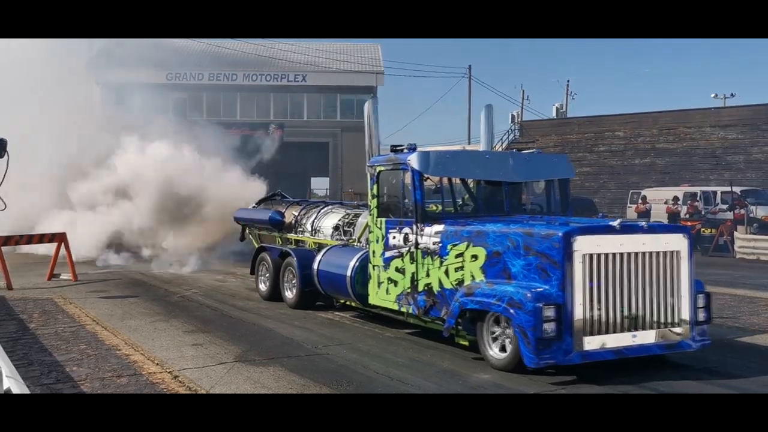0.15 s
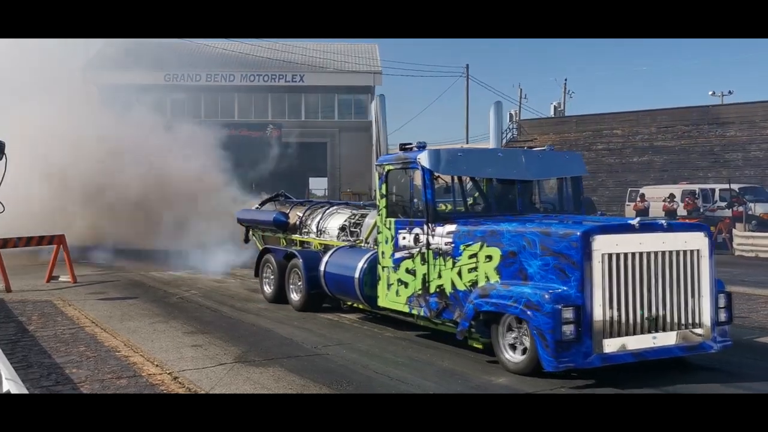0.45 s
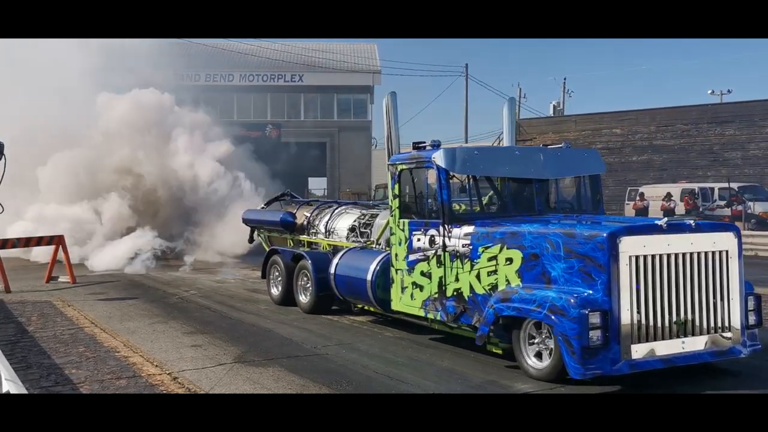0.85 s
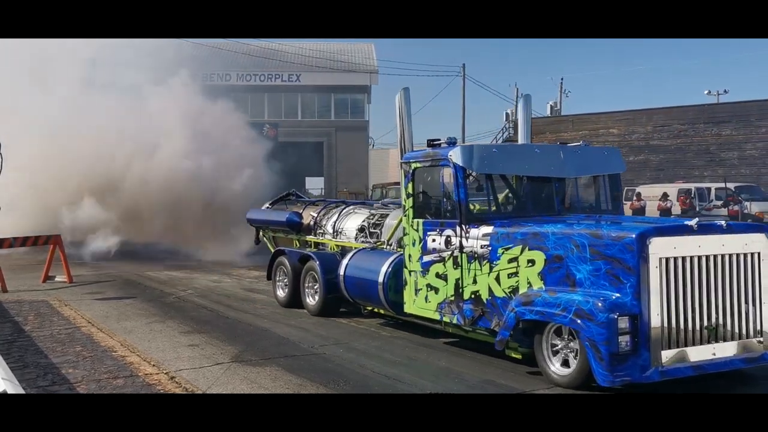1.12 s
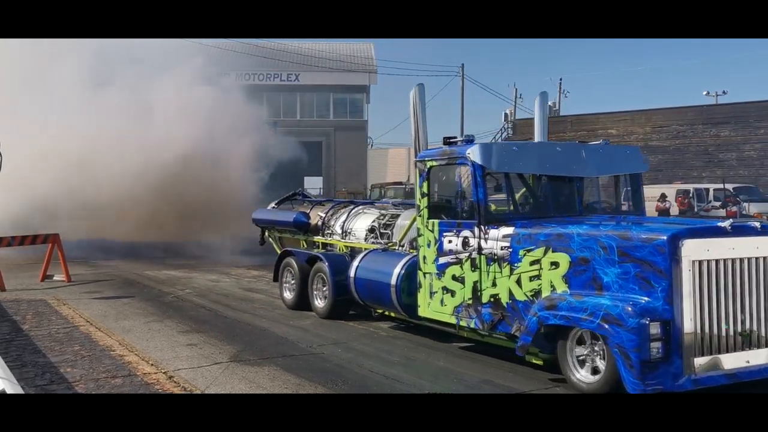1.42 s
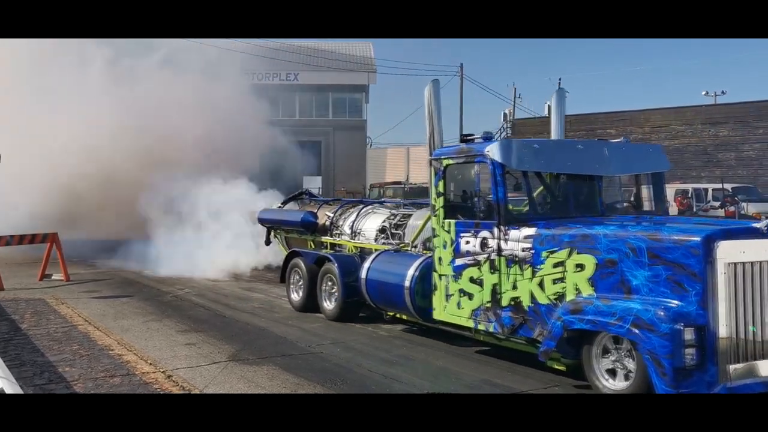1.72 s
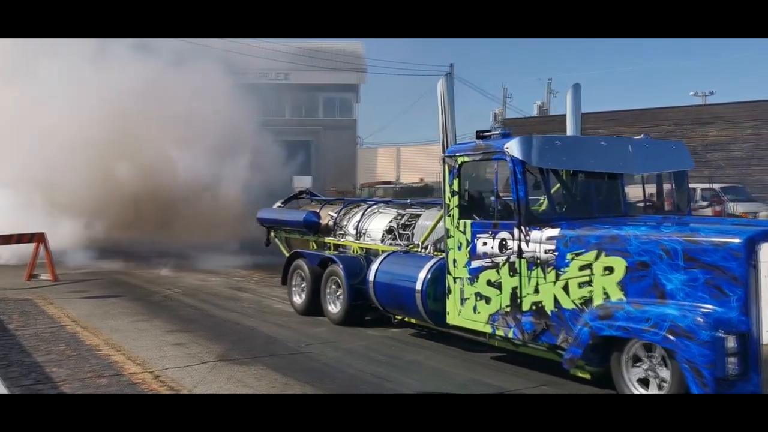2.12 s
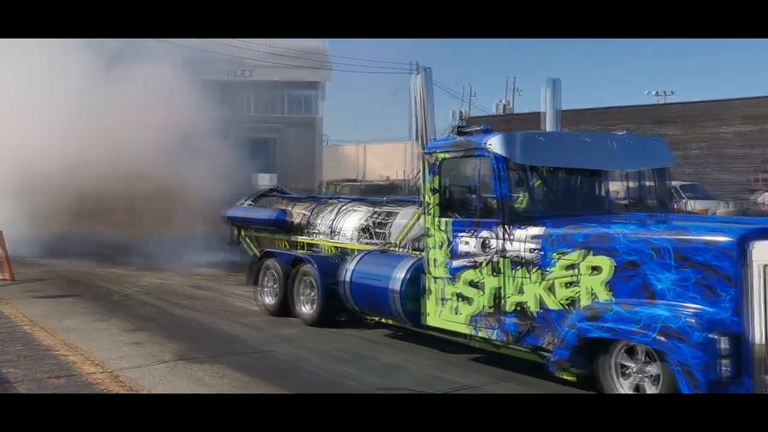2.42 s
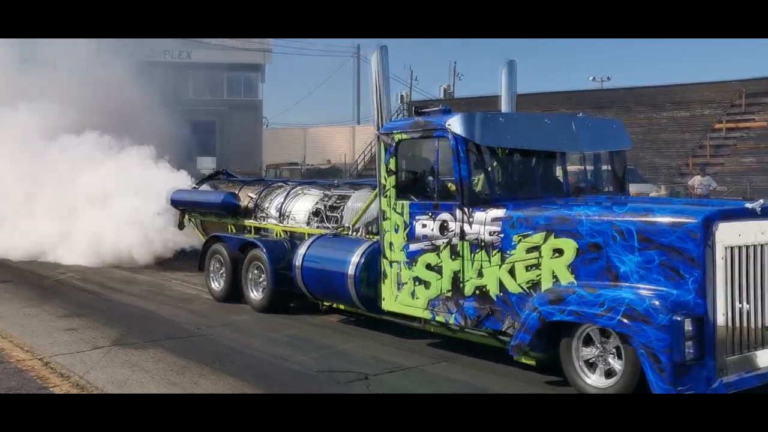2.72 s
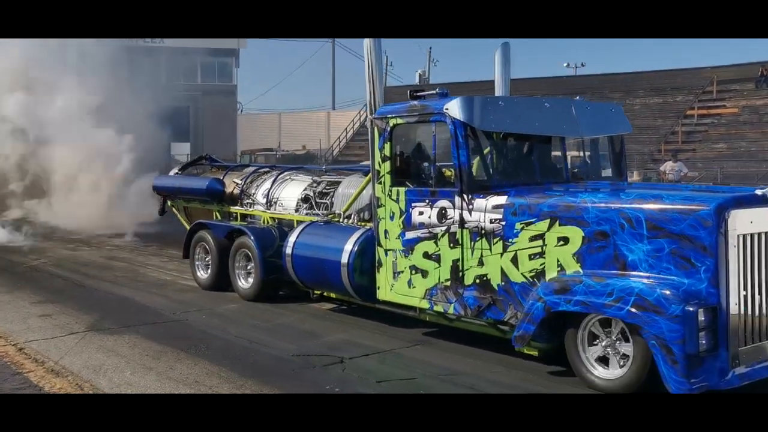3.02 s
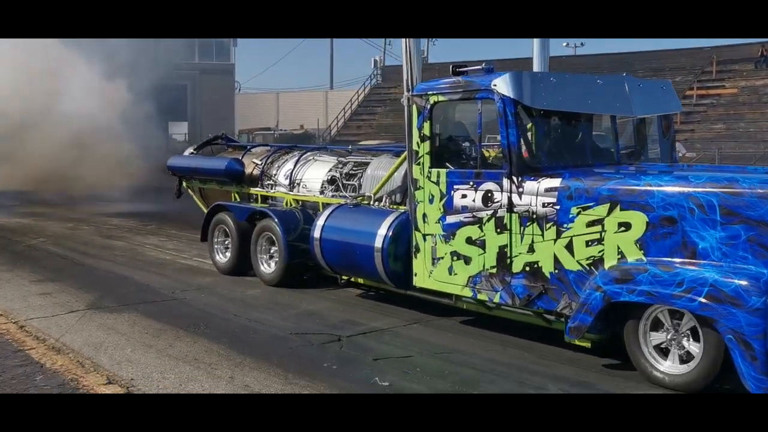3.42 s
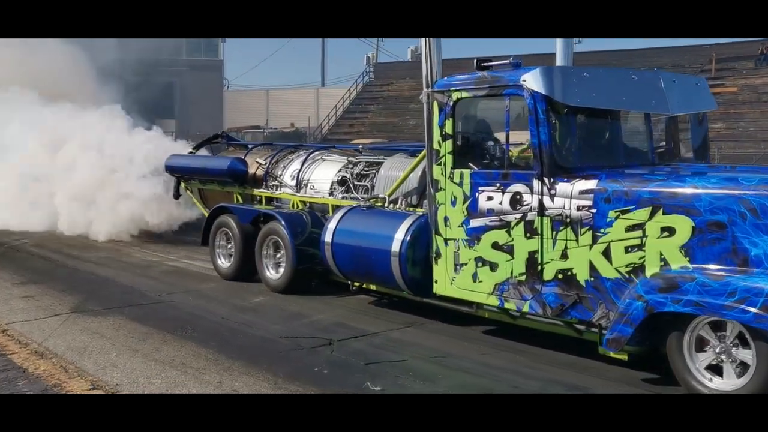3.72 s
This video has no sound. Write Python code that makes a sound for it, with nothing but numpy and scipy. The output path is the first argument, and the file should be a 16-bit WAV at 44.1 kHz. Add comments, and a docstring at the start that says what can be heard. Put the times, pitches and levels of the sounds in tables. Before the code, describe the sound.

Jet engine afterburner fires four overloaded double booms over a piercing turbine whine and steady roar

```python
"""The afterburner of a jet-engined truck lights four times with a boom, close enough to overload the microphone.
Each burn cracks, tears and rumbles for a quarter second, then goes out with a second boom and a darker rumble.
Booms are short rising sine swings; the flame is coloured noise. Each burn drags the shaft speed down a little.
The compressor whines in tones locked to the shaft; behind it the turbine roars and hisses in coloured noise
as the truck creeps past on a drag strip. Two microphone ports hear it all in stereo."""
import sys
import numpy as np
from scipy import signal
from scipy.fft import rfft, irfft, next_fast_len
from scipy.io import wavfile

SR = 44100
rng = np.random.default_rng(int(sys.argv[2]) if len(sys.argv) > 2 else 0)


def transcribe(u):
    """Save the signal u as a 16-bit wav file named by the first command-line argument.

    u: samples, shape (n,) or (channels, n), limited to [-1, 1]; the rate is SR.
    q: integer samples, one column per channel.
    """
    v = np.clip(np.atleast_2d(u).T, -1, 1)
    q = np.round(v * 32767).astype(np.int16)
    wavfile.write(sys.argv[1], SR, q)


N = 170226

# Afterburner burns: (lights [s], goes out [s], roar offset [dB], tearing offset [dB], blade-tone sag [Hz],
# sag length [s], after-rumble offset [dB], after-rumble length [s], lighting boom pitch [Hz], closing boom [dB])
BURNS = [(0.092, .323, -2, -1, 23.9, .23, 2, 0.098, 41.5, 6),
         (0.823, 1.057, -1, 1.5, 24.25, .27, 1.5, 0.13, 41, 5),
         (1.93, 2.176, 0, -0.5, 26.95, .22, 3, 0.069, 50, 4),
         (2.955, 3.203, 0, 2.5, 30.46, .35, 1, 0.14, 59, 3.5)]

# Flame noise colours, low rumble, brighter tearing, crack of lighting, darker rumble after it goes out:
# (frequency [Hz], relative level [dB per Hz])
RUMBLE_COLOUR = [(20, -16), (50, -6), (75, -3), (110, 1), (160, 2), (210, 3.5), (280, 0), (340, -5),
                 (450, -16.5), (700, -16), (1500, -31), (5000, -76)]
TEARING_COLOUR = [(100, -2), (300, -4), (650, 2), (850, -10.5), (1120, -5), (1500, -9.5), (2400, -5),
                  (3500, -17.5), (7000, -25.5), (15000, -27.5)]
CRACK_COLOUR = [(60, 1), (250, -2), (600, -3), (1000, -12), (1500, -23), (4000, -31), (10000, -37)]
AFTER_COLOUR = [(20, -16), (50, 2), (75, -10), (110, 5.5), (160, 3), (210, 1), (280, 1), (340, -13.5),
                (480, -19.5), (800, -19), (1500, -28.5), (5000, -65)]
# Flame across the two ports: (frequency [Hz], left minus right [dB])
FLAME_BALANCE = [(60, 3), (200, 0), (380, -2.5), (700, -7), (1050, -5.5), (2400, -9), (8000, -8.5)]
# Flame likeness of the two ports: (frequency [Hz], correlation [0 to 1])
FLAME_LIKENESS = [(100, 0.98), (250, 0.94), (450, 0.79), (700, 0.83), (1400, 0.57), (4000, 0.067)]

# Compressor blade tone, its octave and its third harmonic, before the port offsets: (time [s], level [dB])
BLADE_LEVEL = [(0.0, -20.5), (0.11, -30), (0.13, -18), (0.22, -12.5), (0.26, -26.5), (0.3, -16.5),
               (0.35, -37), (0.39, -20), (0.82, -20.5), (0.84, -28), (0.95, -26), (1.01, -40), (1.14, -13),
               (1.26, -31), (1.31, -17.5), (1.47, -30), (1.55, -18), (1.78, -20), (1.96, -25.5),
               (1.99, -17), (2.05, -22.5), (2.13, -8.5), (2.21, -29), (2.35, -15.5), (2.43, -13.5),
               (2.74, -28), (2.82, -17.5), (2.95, -25), (2.97, -38), (3.17, -21.5), (3.36, -24.5),
               (3.45, -41), (3.48, -24.5), (3.65, -15.5), (3.82, -16), (3.86, -16)]
OCTAVE_LEVEL = [(0.0, -27), (0.98, -35.5), (1.03, -25), (1.1, -39), (1.38, -27.5), (1.48, -32), (1.55, -25),
                (1.76, -33.5), (2.1, -22.5), (2.22, -51), (2.26, -34), (2.49, -22.5), (2.53, -25),
                (2.92, -18), (2.97, -28), (3.0, -19), (3.24, -40.5), (3.43, -14.5), (3.62, -28),
                (3.86, -26)]
THIRD_LEVEL = [(0.0, -29), (0.32, -41), (0.59, -27), (0.65, -40), (1.26, -35), (1.27, -37), (1.5, -26),
               (1.55, -37), (2.17, -46), (2.2, -36), (2.31, -30), (2.42, -42), (2.49, -36), (2.68, -29.5),
               (2.71, -47), (3.27, -38), (3.39, -24), (3.86, -44)]
# Port offsets of those three tones: (left [dB], right [dB], left flutter [share], right flutter [share])
HARMONIC_PORTS = [(-5.5, 7.5, 0.45, 0.3), (2, 2.5, 0.15, 0.88), (0, 4, 0.93, 0.86)]
# Shaft tones that stand out beside the blade tones: (multiple of shaft speed)
SHAFT_ORDERS = [22, 27, 51, 84, 97]
# Their levels: (left [dB], right [dB])
SHAFT_LEVELS = [(-52, -40), (-43, -31), (-53, -40), (-43, -45), (-57, -44)]

# Turbine roar colour: (frequency [Hz], relative level [dB per Hz])
ROAR_COLOUR = [(20, -17), (45, -2.5), (90, -0.5), (150, 2.5), (280, -1.5), (430, -7.5), (640, 1),
               (930, -6.5), (1200, -4), (1480, -7.5), (1760, -1), (1980, -6), (2280, 2), (2600, -7),
               (2880, -4.5), (3300, -10.5), (4000, -5.5), (4650, -4), (5700, -10.5), (6900, -7),
               (7700, -13.5), (10000, -15), (10700, -13), (13200, -15.5), (13900, -19.5), (15700, -19.5)]
# Roar across the two ports: (frequency [Hz], left minus right [dB])
ROAR_BALANCE = [(60, 3.5), (200, -0.5), (400, -2), (700, -4.5), (1300, -6.5), (1800, -8.5), (2400, -10),
                (3300, 0.5), (5500, -5), (6700, -2), (7500, -5), (9000, 7.5), (10800, -12), (15000, -9.5)]
# Likeness of the two ports for roar and hiss: (frequency [Hz], correlation [0 to 1])
ENGINE_LIKENESS = [(60, 1), (290, 0.86), (640, 0.7), (1400, 0.3), (3100, 0.13), (7000, 0.017)]
# Intake hiss colour: (frequency [Hz], relative level [dB per Hz])
HISS_COLOUR = [(300, -17), (1200, -10), (2400, 5), (3400, -5.5), (4800, -1.5), (6500, -3.5), (8000, -12.5),
               (11000, -8), (15500, -19)]
# Hiss growing as the engine's mouth comes into view: (time [s], level [dB])
HISS_LEVEL = [(0, -33), (2.4, -23), (3.15, -21.5), (3.4, -18), (3.56, -15), (3.86, -16)]
# Hiss across the two ports: (frequency [Hz], left minus right [dB])
HISS_BALANCE = [(1500, 2.5), (2400, -0.5), (3500, -11), (4600, 4), (6000, -7.5), (8500, 2), (11000, -6.5)]

# Booms
LIGHT_BOOM_DB, LIGHT_RISE_HZ_PER_S, LIGHT_ATTACK_S, LIGHT_DECAY_S = 4.5, 1340, 0.012, 0.017
OUT_BOOM_HZ, OUT_RISE_HZ_PER_S, OUT_ATTACK_S, OUT_DECAY_S = 35.5, 656, 0.029, 0.017
BOOM_SIDES_DB = (-1, -3)  # left, right
BOOM_ROUGH = 0.19  # share by which turbulence shakes the pressure wave
# Flame
RUMBLE_DB, RUMBLE_RISE_S, RUMBLE_FADE_DB_PER_S, RUMBLE_FALL_DB_PER_S = -5.5, 0.013, 18, 300
TEARING_DB, TEARING_RISE_S, TEARING_HOLD_S, TEARING_FALL_DB_PER_S = -11.5, 0.035, 0.11, 55
CRACK_DB, CRACK_DELAY_S, CRACK_DECAY_S = -3.5, 0.009, 0.028
AFTER_DB, AFTER_DELAY_S, AFTER_RISE_S, AFTER_FALL_DB_PER_S = -6, 0.018, 0.012, 155
FLAME_LEAD_S = 0.00022  # the flame is nearer the left port
# Compressor
BLADES = 21
WHINE_HZ = 2267.2  # blade tone between burns
OVERSHOOT_HZ, OVERSHOOT_S, SETTLE_S = 11, 0.092, 0.13  # the shaft runs fast for a moment after each sag
LEFT_FOLLOWS = 0.62  # share of the swings in level [dB] that reaches the left port
BUZZ_DB = (-49, -46)  # average level of each shaft multiple in the buzz: left, right
RASP_MIDDLE_S, RASP_LENGTH_S, RASP_DB, RASP_WIDTH_HZ = 3.52, 0.3, -20, 140
# Turbine and microphone
ROAR_DB = -16.5
CEILING, KNEE = 0.93, 4.5  # overload level of the microphone and how hard it bends
EDGE_HZ = 15750  # upper band limit

T = np.arange(N) / SR
PADDED = next_fast_len(N)
HZ = np.fft.rfftfreq(PADDED, 1 / SR)


def amp(db):
    """Decibels to gain."""
    return 10 ** (np.asarray(db) / 20)


def evened(x):
    """Scales to unit rms."""
    return x / np.sqrt(np.mean(abs(x) ** 2) + 1e-20)


def over_hz(points):
    """Reads a table on a log-frequency axis."""
    f, value = np.transpose(points)
    return np.interp(np.log(HZ + 1), np.log(f + 1), value)


def over_time(points):
    """Reads a table along time."""
    return np.interp(T, *np.transpose(points))


def wander(rate_hz):
    """Slow random motion of unit rms: noise that loses half its amplitude at rate_hz."""
    spectrum = rfft(rng.standard_normal(PADDED))
    slowed = spectrum / (1 + (HZ / rate_hz) ** 2) * (HZ > 0)
    return evened(irfft(slowed, PADDED)[:N])


def turbulence(colour, balance, likeness, lead_s=0):
    """Coloured noise as the two microphone ports hear it, the left one lead_s early."""
    left, other = rfft(rng.standard_normal((2, PADDED)))
    same = np.clip(over_hz(likeness), -1, 1)
    tilt = amp(over_hz(balance) / 2)
    right = same * left + np.sqrt(1 - same ** 2) * other
    right = right * np.exp(-2j * np.pi * HZ * lead_s)
    ports = np.array([left * tilt, right / tilt]) * amp(over_hz(colour))
    return evened(irfft(ports, PADDED)[:, :N])


def flutter(share, rate_hz):
    """A steady path plus paths scattered by hot air: a complex gain."""
    scattered = evened(wander(rate_hz) + 1j * wander(rate_hz))
    return (1 + share * scattered) / np.sqrt(1 + share ** 2)


def boom(start, db, hz, rise_hz_per_s, attack_s, decay_s):
    """A few heavy swings of pressure that quicken as they die."""
    t = np.maximum(T - start, 0)
    swell = np.sqrt(np.minimum(t / attack_s, 1)) * np.exp(-np.maximum(t - attack_s, 0) / decay_s)
    return amp(db) * swell * np.sin(2 * np.pi * (hz * t + rise_hz_per_s * t ** 2 / 2))


def afterburner_booms():
    """Lighting pushes the air out; going out sucks it back, so the second wave has the opposite sign."""
    pressure = np.zeros(N)
    for on, off, *_, light_hz, out_db in BURNS:
        pressure += boom(on, LIGHT_BOOM_DB, light_hz, LIGHT_RISE_HZ_PER_S, LIGHT_ATTACK_S, LIGHT_DECAY_S)
        pressure -= boom(off, out_db, OUT_BOOM_HZ, OUT_RISE_HZ_PER_S, OUT_ATTACK_S, OUT_DECAY_S)
    return amp(BOOM_SIDES_DB)[:, None] * pressure * (1 + BOOM_ROUGH * wander(140))


def flame(lumpy_db=2.0):
    """Each burn cracks alight, tears and rumbles; a darker rumble rolls on after it goes out."""
    rumble, tearing, crack, after = np.zeros((4, N))
    for on, off, roar_db, tear_db, _, _, after_db, after_s, *_ in BURNS:
        age, since = np.maximum(T - on, 0), np.maximum(T - off, 0)

        rumble_db = RUMBLE_DB + roar_db - RUMBLE_FADE_DB_PER_S * age - RUMBLE_FALL_DB_PER_S * since
        rumble += np.clip(age / RUMBLE_RISE_S, 0, 1) * amp(rumble_db)

        past_hold = np.maximum(age - TEARING_HOLD_S, 0)
        tearing_db = TEARING_DB + tear_db - TEARING_FALL_DB_PER_S * past_hold
        tearing += np.clip(age / TEARING_RISE_S, 0, 1) * amp(tearing_db)

        crack_fade = np.exp(-abs(age - CRACK_DELAY_S) / CRACK_DECAY_S)
        crack += amp(CRACK_DB + roar_db) * (age > CRACK_DELAY_S) * crack_fade

        roll_db = AFTER_DB + after_db - AFTER_FALL_DB_PER_S * np.maximum(since - after_s, 0)
        after += np.clip((since - AFTER_DELAY_S) / AFTER_RISE_S, 0, 1) * amp(roll_db)

    tearing = tearing * amp(lumpy_db * wander(72))
    layers = [(rumble, RUMBLE_COLOUR), (tearing, TEARING_COLOUR), (crack, CRACK_COLOUR), (after, AFTER_COLOUR)]
    return sum(level * turbulence(colour, FLAME_BALANCE, FLAME_LIKENESS, FLAME_LEAD_S)
               for level, colour in layers)


def blade_cycles(jitter_hz=2.1):
    """Blade-tone cycles so far: the speed sags during each burn, overshoots and settles."""
    hz = WHINE_HZ + jitter_hz * wander(9.1)
    for on, _, _, _, sag_hz, length, *_ in BURNS:
        hz = hz - sag_hz * np.sin(np.pi * np.clip((T - on) / length, 0, 1))
        hz = hz + OVERSHOOT_HZ * np.exp(-((T - on - length - OVERSHOOT_S) / SETTLE_S) ** 2)
    return np.cumsum(hz) / SR


def blade_tones(turn):
    """Blades passing make a tone and two harmonics, each fluttering through hot air to each port."""
    out = np.zeros((2, N))
    tables = (BLADE_LEVEL, OCTAVE_LEVEL, THIRD_LEVEL)
    for harmonic, (points, row) in enumerate(zip(tables, HARMONIC_PORTS), 1):
        level = over_time(points)
        tone = np.exp(harmonic * turn)
        left_level = level.mean() + LEFT_FOLLOWS * (level - level.mean())
        for port, port_level in enumerate((left_level, level)):
            gain = amp(port_level + row[port])
            out[port] += (gain * tone * flutter(row[port + 2], rate_hz=21)).real
    return np.sqrt(2) * out  # levels are rms


def shaft_tones(turn):
    """Single multiples of the shaft speed that stand out beside the blade tones."""
    out = np.zeros((2, N))
    for order, sides_db in zip(SHAFT_ORDERS, SHAFT_LEVELS):
        tone = np.exp(turn * order / BLADES) * flutter(share=1.0, rate_hz=10)
        out += amp(sides_db)[:, None] * tone.real
    return np.sqrt(2) * out


def shaft_buzz(turn):
    """One random waveform repeats every shaft turn, holding all multiples from about 2 to 7 kHz."""
    cycle = np.zeros((2, 2049), complex)
    cycle[:, BLADES:3 * BLADES] = rng.standard_normal((2, 2 * BLADES, 2)) @ [1, 1j]
    place = (turn.imag / (2 * np.pi * BLADES)) % 1
    sides = [amp(db) * evened(np.interp(place, np.linspace(0, 1, len(wave)), wave))
             for db, wave in zip(BUZZ_DB, irfft(cycle))]
    return np.array(sides) * np.sqrt(2 * BLADES)  # 2 * BLADES multiples share the power


def intake_rasp(turn):
    """Rough sidebands of the octave tone, right port only, as the intake swings into view."""
    swell = amp(RASP_DB) * np.exp(-((T - RASP_MIDDLE_S) / RASP_LENGTH_S) ** 2)
    rasp = swell * np.exp(2 * turn) * flutter(share=3.2, rate_hz=RASP_WIDTH_HZ)
    return np.sqrt(2) * np.array([np.zeros(N), rasp.real])


def whine():
    """Compressor tones, buzz and rasp, all locked to one shaft."""
    turn = 2j * np.pi * blade_cycles()
    return blade_tones(turn) + shaft_tones(turn) + shaft_buzz(turn) + intake_rasp(turn)


def turbine(flicker_db=0.45):
    """The steady exhaust roar and the growing hiss of the intake, flickering slightly together."""
    roar = amp(ROAR_DB) * turbulence(ROAR_COLOUR, ROAR_BALANCE, ENGINE_LIKENESS)
    hiss = amp(over_time(HISS_LEVEL)) * turbulence(HISS_COLOUR, HISS_BALANCE, ENGINE_LIKENESS)
    return (roar + hiss) * amp(flicker_db * wander(84))


def scene():
    """Afterburner booms and flame in front, whine and turbine behind."""
    return afterburner_booms() + flame() + whine() + turbine()


def record(dry):
    """The microphone overloads softly; then a low-pass filter limits the band."""
    squashed = dry / (1 + abs(dry / CEILING) ** KNEE) ** (1 / KNEE)
    low_pass = signal.firwin(511, EDGE_HZ, window=("kaiser", 9), fs=SR)
    return signal.oaconvolve(squashed, low_pass[None], "same")


dry = scene()
out = record(dry)
transcribe(out)
```